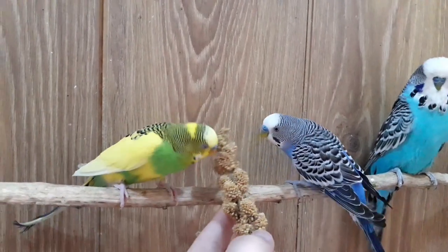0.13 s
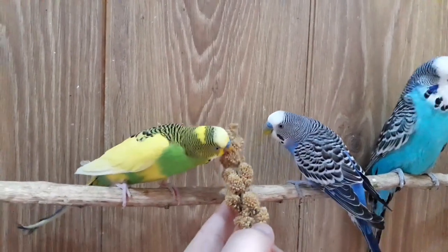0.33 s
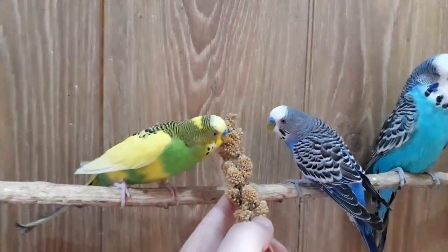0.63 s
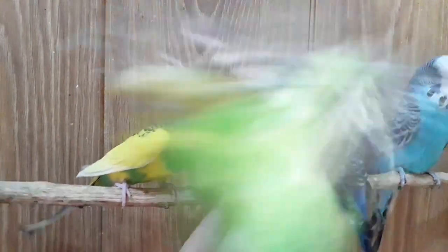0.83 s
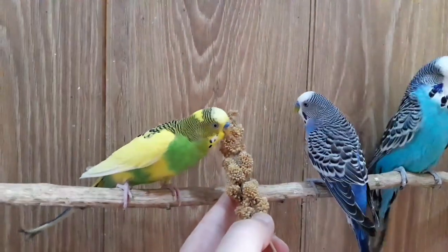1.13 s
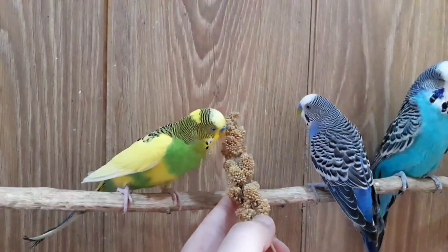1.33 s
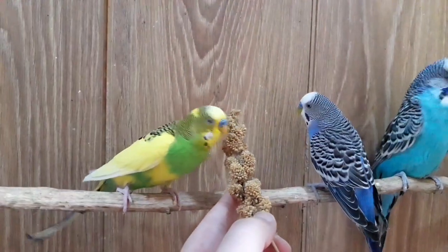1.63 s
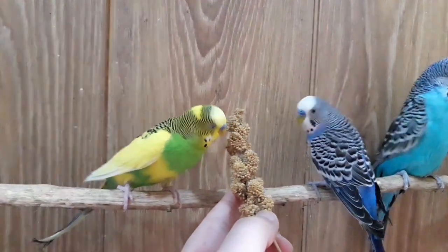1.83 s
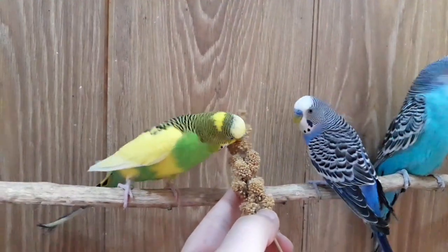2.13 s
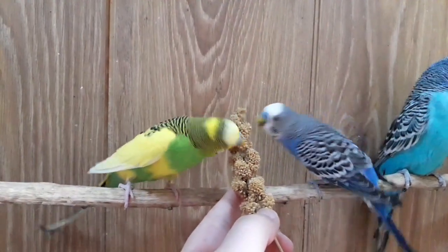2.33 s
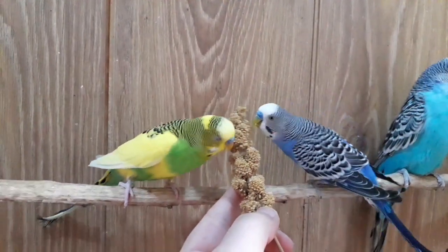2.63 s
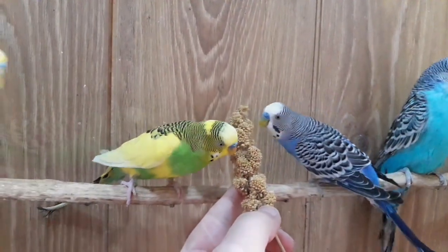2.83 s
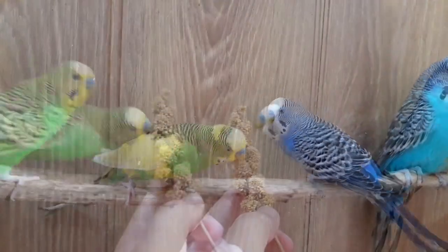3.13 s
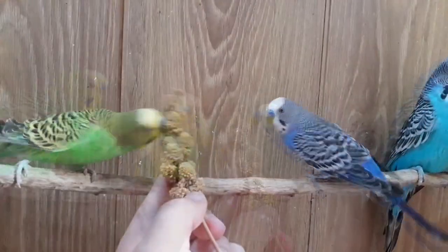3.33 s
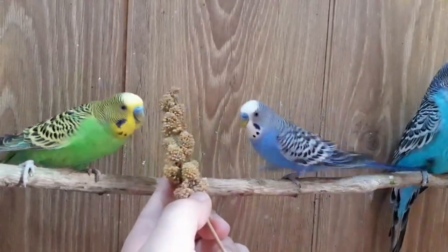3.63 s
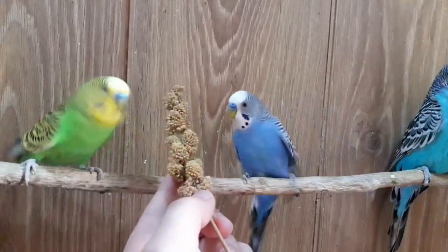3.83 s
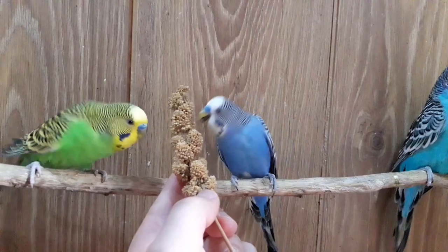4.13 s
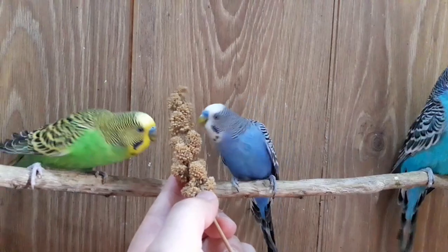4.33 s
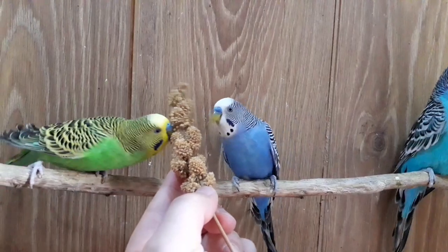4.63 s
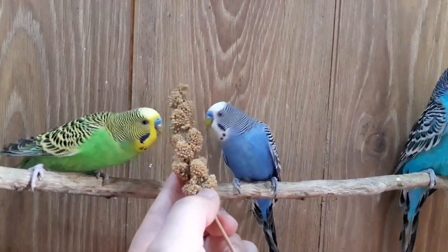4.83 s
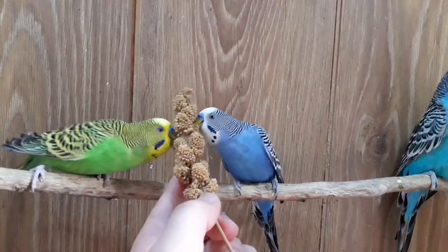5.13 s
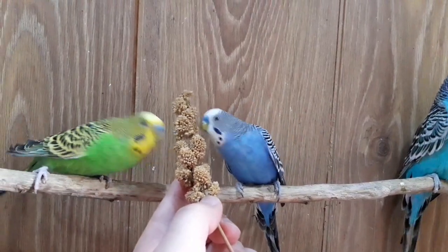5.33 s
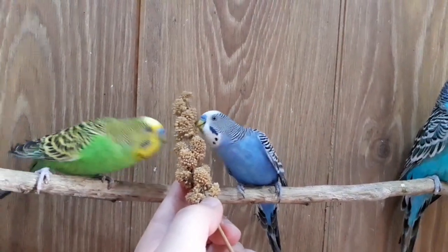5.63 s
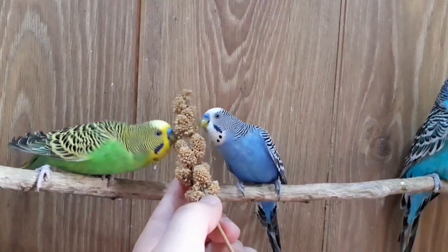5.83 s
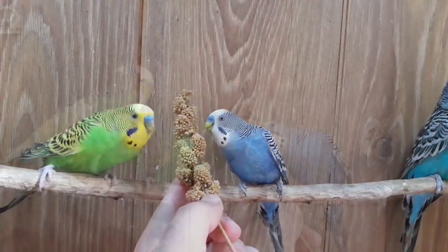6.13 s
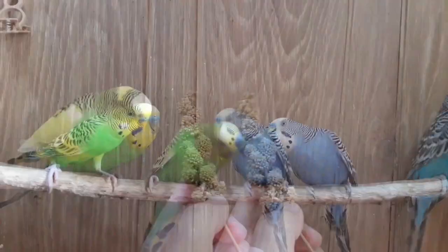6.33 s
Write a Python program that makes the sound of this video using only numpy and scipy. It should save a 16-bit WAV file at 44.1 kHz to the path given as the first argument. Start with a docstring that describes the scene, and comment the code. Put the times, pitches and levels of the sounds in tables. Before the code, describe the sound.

Close up in a quiet, dry room, budgies share a millet spray on a wooden perch. Feathers rustle, then a brief flutter brings rapid, low wing thumps on the microphone. Fine, crisp seed cracking follows and thickens, interrupted by another feather rustle and low, humming perch bumps. Nibbling continues with dull little taps and a short thin peep near the end.

```python
"""Feathers rustle in a hushed room while budgies on a wooden perch nibble at a spray of millet.
A neighbour peeps, steps set the perch humming, beaks crack hulls, and a fluttering bird blows on the microphone.
Feathers, nibbles and cracks are shaped noise, with a microphone ring in the cracks; peeps and hum are wavering tones.
Gusts are single pressure swings, hops rub wood resonances, and dropped bits tap as short low tones."""
import sys
import numpy as np
from scipy import signal
from scipy.fft import rfft, irfft, next_fast_len
from scipy.io import wavfile

SR = 44100
rng = np.random.default_rng(int(sys.argv[2]) if len(sys.argv) > 2 else 0)


def to_wav(sig):
    """Store sig (one row per channel, or 1-D mono) as 16-bit WAV at the path in sys.argv[1].

    Samples outside -1..1 are clipped; the rate is SR.
    """
    pcm = np.clip(np.atleast_2d(sig), -1, 1) * 32767
    pcm = np.round(pcm).astype(np.int16)
    wavfile.write(sys.argv[1], SR, pcm.T)  # frames by channels


N = 286209
TIME = np.arange(N) / SR   # seconds


def amp(db):
    """Turn decibels into a gain."""
    return 10 ** (np.asarray(db) / 20)


def unit(x):
    """Scale to an average (rms) level of 1."""
    return x / np.sqrt(np.mean(x ** 2) + 1e-20)


def curve(rows, column=1, outside=None):
    """Join one column of a table by straight lines in time."""
    rows = np.array(rows)
    return np.interp(TIME, rows[:, 0], rows[:, column], outside, outside)


def colour(x, points):
    """Shape the spectrum of a signal by points joined on a log-frequency axis."""
    size = next_fast_len(N)
    hz = np.maximum(np.arange(size // 2 + 1) * SR / size, 1)
    points = np.array(points)
    gain_db = np.interp(np.log(hz), np.log(points[:, 0]), points[:, 1])
    return unit(irfft(rfft(x, size) * amp(gain_db), size)[:N])


def band(x, low_hz, high_hz):
    """Keep mainly what lies between two frequencies."""
    edges_hz = [low_hz, min(high_hz, .45 * SR)]
    return signal.sosfilt(signal.butter(2, edges_hz, "band", fs=SR, output="sos"), x)


def resonance(x, hz, width_hz):
    """Ring at one frequency, with gain 1 on top; a narrow width rings longer."""
    r = np.exp(-np.pi * width_hz / SR)
    feedback = [1, -2 * r * np.cos(2 * np.pi * hz / SR), r * r]
    return signal.lfilter([(1 - r * r) / 2, 0, (r * r - 1) / 2], feedback, x)


def drift(rate_hz):
    """Wander slowly by chance, with a spread of 1."""
    r = np.exp(-2 * np.pi * rate_hz / SR)
    wander = signal.lfilter([1], [1, -2 * r, r * r], rng.standard_normal(N + SR))
    return unit(wander[SR:])   # skip the first second, while the filter settles


def add(out, s, burst):
    """Mix a burst in at a moment."""
    at = max(round(s * SR), 0)
    out[at:at + len(burst)] += burst[:N - at]


def swell(s, peak_db, rise_db_per_s, held_s, fall_db_per_s, choke_db_per_s2=0):
    """Gain that rises to a crest, holds and dies, straight in decibels or ever faster."""
    early = np.minimum(TIME - s, 0)
    late = np.maximum(TIME - s - held_s, 0)
    db = peak_db + early * rise_db_per_s - late * (fall_db_per_s + late * choke_db_per_s2)
    gain, heard = np.zeros(N), db > -125
    gain[heard] = amp(db[heard])
    return gain


# moves of the plumage, each swelling fast and dying away:
# crest_s, swish_db, fall_db_per_s, body_db (low part, relative to swish), sizzle_db (top part, likewise)
PLUMAGE_MOVES = [(0.0, -48, 91.5, -1.5, -5), (0.068, -64.5, 248, -2.5, -11), (.16, -68, 65, -47, -13),
                 (.37, -55.5, 106, -16.5, -4), (0.449, -62, 150.5, -27.5, -9), (.542, -43.5, 57.5, -13, 1),
                 (.572, -44, 87.5, -5.5, -1.5), (0.63, -47, 169.5, -1, -4),
                 (0.689, -45.5, 220.5, -6.5, -1.5), (0.745, -44.5, 259.5, -2, 0.5),
                 (0.804, -37.5, 259.5, -3, -4), (0.857, -40, 229.5, -2.5, -5),
                 (0.919, -41, 246.5, -2, -3.5), (0.984, -31, 270, -8, -0.5), (1.016, -30, 150, -8.5, -4),
                 (1.089, -47.5, 304, -4.5, -3.5), (1.13, -37.5, 177, 1.5, -3.5),
                 (1.173, -52.5, 207, 10.5, -14), (1.3, -79, 303, -11, -1), (1.378, -66, 188, 6, -15),
                 (1.45, -59.5, 270, -6, 4.5), (1.7, -54, 270, -8, -6), (1.788, -61, 108, 1, -6),
                 (1.858, -55, 303, -33, -27), (2.975, -56.5, 177, -1.5, -1), (3.058, -55, 95, -3.5, -1),
                 (3.097, -47.5, 178, -3, -2.5), (3.194, -44, 317, -7, -2.5), (3.274, -51, 150, -7, -8),
                 (3.3, -40.5, 147, -2.5, -5), (3.342, -63.5, 204, -10, 3), (3.466, -55, 141, -0.5, -2.5),
                 (3.575, -47, 298, -8, -7), (3.674, -56.5, 43, 1, -5), (3.849, -54.5, 146, -10, 1.5),
                 (3.91, -71.5, 103, 5.5, -1), (3.96, -67, 240, -28, 5), (4.421, -57.5, 68, -9.5, 0.5),
                 (4.472, -62, 153, -13.5, -22), (4.828, -52, 210, -16, -9), (5.378, -61, 207, -26, -11),
                 (6.39, -68.5, 195, -1.5, 6.5), (6.426, -57.5, 130, -14, -6)]
# sharper feather strokes on top of the swish: start_s, level_db, sizzle_db (relative to swish), length_s
FEATHER_STROKES = [(0.557, -45, -1.5, 0.036), (0.654, -52, -2, 0.013), (0.692, -74, 11, 0.027),
                   (0.703, -42, 3, 0.0046), (0.748, -43, 4, 0.018), (0.803, -41.5, -0.5, 0.03),
                   (0.857, -45, 3, 0.025), (0.872, -56, 0, 0.012), (0.916, -56.5, 1.5, 0.044),
                   (0.972, -48, -1, 0.023), (1.007, -38.5, -25, 0.019), (1.041, -34, -12, 0.021),
                   (1.127, -39, -10, 0.016), (1.16, -56, -8, 0.013), (3.562, -68, -16, 0.028)]
# tone colour of feathers before they are split into registers: pitch_hz, density_db (per Hz)
FEATHER_COLOUR = [(150, 20.5), (250, 2.5), (470, -9.5), (1110, -9.5), (1750, -2.5), (3010, -1),
                  (4350, -0.5), (5190, 0), (6630, 4), (7500, 1), (9420, -0.5), (15100, -10.5),
                  (16500, -32.5)]
RUSTLE_RISE_DB_PER_S = 2000.5


def plumage():
    """Vanes slide over each other: grainy noise in three registers, with sharper strokes on top."""
    grain_size = amp(3.0 * np.minimum(rng.exponential(1, N), 3))
    barbs = (rng.random(N) < 4000 / SR) * grain_size * rng.standard_normal(N)   # about 4000 grains a second
    lumpy = rng.standard_normal(N) * amp(1.27 * drift(110))
    air = colour(0.52 * unit(barbs) + lumpy, FEATHER_COLOUR)
    body = unit(band(band(air, 290, 2600), 330, 2700))
    swish = unit(band(air, 1600, 6870))
    sizzle = unit(band(air, 5000, 22000))
    swish = unit(swish + 0.82 * resonance(swish, 4200, 950))   # the microphone favours a band near 4.2 kHz
    body = body * amp(0.84 * drift(39))   # body and sizzle each flutter on their own
    sizzle = sizzle * amp(1.8 * drift(28))

    rustles = np.zeros(N)
    for s, swish_db, fall, body_db, sizzle_db in PLUMAGE_MOVES:
        mix = swish + amp(body_db) * body + amp(sizzle_db) * sizzle
        rustles += swell(s, swish_db, RUSTLE_RISE_DB_PER_S, 0, fall) * mix

    swish_gain, sizzle_gain = np.zeros((2, N))
    t = np.arange(4000) / SR
    for s, level_db, sizzle_db, length in FEATHER_STROKES:
        # the vanes part abruptly
        stroke = amp(level_db) * (1 - np.exp(-t / .0015)) * np.exp(-(t / length) ** 3)
        add(swish_gain, s, stroke)
        add(sizzle_gain, s, amp(sizzle_db) * stroke)
    return (rustles + swish_gain * swish + sizzle_gain * sizzle) * amp(2.0 * drift(41))


# tone colour of the room's hush: pitch_hz, density_db (per Hz)
HUSH_COLOUR = [(15, -68.5), (25, -13), (65, 7.5), (124, 6.5), (280, -5), (1090, -13), (2820, -15.5),
               (4020, -41.5), (5720, -33.5), (9850, -18), (14400, -16.5), (16500, -27)]
HUSH_DB = -72.5   # before its slow drift


def hush():
    """The quiet room is steady coloured noise whose level wanders slowly."""
    return amp(HUSH_DB) * colour(rng.standard_normal(N), HUSH_COLOUR) * amp(1.5 * drift(6))


# nibbling, joined by straight lines; it also guides the small cracks: time_s, rustle_db (before flicker)
NIBBLE_LEVEL = [(0, -78), (.13, -94), (.16, -71), (.5, -68), (1.2, -70), (1.35, -73), (1.5, -66),
                (2.05, -68), (2.2, -69.5), (2.25, -78), (2.34, -79), (2.37, -69.5), (2.68, -65.5),
                (2.74, -79.5), (2.78, -63.5), (2.9, -67.5), (3.0, -74.5), (3.6, -71.5), (3.85, -65),
                (4.02, -73.5), (4.07, -88), (4.21, -88), (4.24, -67.5), (4.7, -67), (4.78, -77), (5.0, -67),
                (5.25, -66), (5.33, -77.5), (5.4, -66), (5.47, -77), (5.53, -63), (5.64, -74.5),
                (5.75, -67.5), (6.3, -66.5), (6.35, -73.5), (6.49, -65)]
# tone colour of rubbing hull bits: pitch_hz, density_db (per Hz)
HULL_COLOUR = [(880, -48), (1500, -8.5), (2820, -8.5), (4050, 2), (5360, -2), (8510, 2), (14100, -1.5),
               (16000, -3), (16500, -10.5)]


def nibbling():
    """Tiny hull fragments rub and tick in clumps; the lower and upper treble wander apart."""
    tick_size = amp(1.2 * np.minimum(rng.exponential(1, N), 3))
    ticks = (rng.random(N) < 3000 / SR) * tick_size * rng.standard_normal(N)   # about 3000 ticks a second
    rustle = colour(unit(ticks) + 0.85 * rng.standard_normal(N), HULL_COLOUR)
    lower = band(rustle, 500, 7500)
    upper = rustle - lower
    patchy = lower * amp(2.4 * drift(17.0)) + upper * amp(2.0 * drift(11))
    return amp(curve(NIBBLE_LEVEL) + 2.0 * drift(47) + 2.0 * drift(12)) * patchy


# peeps of a neighbour, and at 3.196 s the short ring of a tick:
# crest_s, held_s, first_hz, last_hz, level_db (before its tremble)
PEEPS_AND_TICK_RING = [(.19, 0.307, 2490, 2485, -75), (1.7, 0.057, 3240, 3290, -72),
                       (1.78, 0.017, 1746, 1780, -65.5), (3.196, 0.0029, 2290, 2280, -50.5),
                       (5.03, 0.12, 2280, 2280, -74.5), (5.28, .04, 2200, 2210, -89.5),
                       (5.92, 0.019, 2230, 2330, -76.5), (6.1, 0.038, 2050, 2010, -71.5),
                       (6.122, 0.043, 3535, 3670, -56.5), (6.175, 0.031, 3670, 3600, -63)]
PEEP_RISE_DB_PER_S, PEEP_FALL_DB_PER_S = 1800, 447.5


def peeps_and_tick_ring(wobble_hz, flutter_db, breath):
    """Thin, hoarse tones with a weak octave: pitch and level tremble, air noise rides on them."""
    wobble = wobble_hz * drift(60)
    voice = amp(flutter_db * drift(53)) + breath * drift(300)
    out = np.zeros(N)
    for s, held, first_hz, last_hz, level_db in PEEPS_AND_TICK_RING:
        pitch = np.interp(TIME, [s, s + held + .03], [first_hz, last_hz])
        phase = 2 * np.pi * np.cumsum(pitch + wobble) / SR
        tone = np.sin(phase) + 0.11 * np.sin(2 * phase)
        out += swell(s, level_db, PEEP_RISE_DB_PER_S, held, PEEP_FALL_DB_PER_S) * tone
    return np.sqrt(2) * voice * out


# steps that set the perch humming: crest_s, level_db, held_s, fall_db_per_s (at first)
PERCH_STEPS = [(.312, -70, 0.0075, 112), (1.406, -60.5, 0.0056, 383), (2.982, -43.5, 0.051, 213),
               (3.45, -43, 0.049, 400), (3.549, -48.5, 0.018, 192), (3.676, -41.5, 0.0067, 402.5),
               (3.721, -48.5, .04, 457), (3.864, -38, 0.056, 65), (4.446, -50.5, 0.052, 170),
               (5.488, -66, .003, 402), (5.643, -58.5, 0.061, 906), (5.738, -58.5, 0.067, 260),
               (6.397, -58, 0.002, 184), (6.46, -66, .003, 260)]
# creaks of the perch under a hop: crest_s, level_db, held_s
PERCH_CREAKS = [(0.601, -48.5, 0.0563), (3.666, -52, 0.0568), (3.85, -58.5, 0.08), (4.008, -94, 0.9),
                (6.4, -68, .07)]
# higher ways the wood can ring in a creak: pitch_hz, width_hz, level_db (relative)
WOOD_MODES = [(544, 110, 13.5), (666, 130, 10.5), (870, 8.7, 5), (1180, 17, 3), (2380, 300, 8),
              (2530, 110, 7)]
# dull taps of dropped bits: start_s, level_db, pitch_hz, t60_s (time to fall by 60 dB)
DULL_TAPS = [(1.573, -43, 169, 0.05), (2.421, -44.5, 159, 0.072), (2.533, -49, 164, 0.032),
             (4.968, -40.5, 162, 0.043), (5.87, -47.5, 132, 0.039), (6.209, -48.5, 181, 0.049)]
PERCH_HZ, STEP_RISE_DB_PER_S = 180.2, 934   # the pitch wavers around this
GRIP_DAMPING_DB_PER_S2 = 898   # the feet close round the perch and choke the hum
CREAK_RISE_DB_PER_S, CREAK_FALL_DB_PER_S = 700, 150.5


def perch():
    """The lowest bending mode hums; a hop rubs the higher modes; taps ring short and low."""
    phase = 2 * np.pi * np.cumsum(PERCH_HZ + 2.5 * drift(8)) / SR
    hum = np.sqrt(2) * np.sin(phase) * amp(.6 * drift(25))
    steps = np.zeros(N)
    for s, level_db, held, fall in PERCH_STEPS:
        steps += swell(s, level_db, STEP_RISE_DB_PER_S, held, fall, GRIP_DAMPING_DB_PER_S2)
    out = hum * steps

    rub = rng.standard_normal(N) * amp(1.8 * drift(54))   # the grip slips in lumps
    grip, wood = np.zeros((2, N))
    for s, level_db, held in PERCH_CREAKS:
        grip += swell(s, level_db, CREAK_RISE_DB_PER_S, held, CREAK_FALL_DB_PER_S)
    for hz, width, level_db in WOOD_MODES:
        wood += amp(level_db) * unit(resonance(resonance(rub, hz, width), hz, 2 * width))
    out += grip * unit(wood)

    t = np.arange(SR // 4) / SR
    for s, level_db, hz, t60 in DULL_TAPS:
        envelope = (1 - np.exp(-t / 0.00033)) * amp(-60 * t / t60)
        add(out, s, amp(level_db) * np.sin(2 * np.pi * hz * t) * envelope)
    return out


FIRST_BREAK_DB, FIRST_BREAK_S = 6, 0.00084   # the first split stands out of the crumble


def splinters(t60, length):
    """A brittle break: lumpy noise, quick rise with a spike, exponential death."""
    t = np.arange(length) / SR
    white, lumps = rng.standard_normal((2, length))
    lumpy = amp(1.77 * unit(signal.lfilter([1], [1, -.95], lumps)))
    spike = amp(FIRST_BREAK_DB * np.exp(-t / FIRST_BREAK_S))
    return white * lumpy * spike * (1 - np.exp(-t / .0005)) * amp(-60 * t / t60)


# hull cracks, with a few feather snaps near 3.1 and 3.3 s:
# time_s, level_db (of the snap, before the last filters), brightest_hz,
# ring_db (microphone, relative to the snap), t60_s (time for the break to fall by 60 dB)
CRACKS_AND_FEATHER_SNAPS = [(0.37, -41.5, 7200, -26, 0.028), (0.4484, -48, 6750, -17, 0.028),
                            (1.294, -37, 8030, -11, 0.028), (1.3075, -44, 8140, -15, 0.025),
                            (1.3733, -54, 9740, -31, 0.028), (1.449, -40.5, 9300, -15, 0.026),
                            (1.517, -43, 12800, -11, 0.028), (1.537, -43.5, 8650, -1, 0.032),
                            (1.656, -50, 8000, -14, 0.028), (1.6837, -37.5, 6120, -20, 0.051),
                            (1.702, -40, 5350, -17, 0.057), (1.721, -36, 12800, -15, 0.028),
                            (1.7724, -38, 9900, -8, 0.037), (1.8357, -49, 8400, -13, 0.021),
                            (1.8667, -39, 8700, -9, 0.036), (1.9895, -46, 8730, -15, 0.051),
                            (2.1114, -40.5, 9250, -17, 0.028), (2.1291, -41.5, 13200, -15.5, 0.084),
                            (2.171, -47.5, 13100, -19, 0.032), (2.2029, -41.5, 9100, -19, 0.028),
                            (2.4195, -49, 8740, -11, 0.028), (2.4718, -49, 14050, -7, 0.028),
                            (2.4923, -37, 10500, -12, 0.018), (2.5446, -44.5, 14100, -15.5, 0.028),
                            (2.563, -41, 13600, -5, 0.028), (2.583, -54, 14300, -15, 0.031),
                            (2.598, -31.5, 11200, -13, 0.054), (2.616, -30.5, 11800, -4, 0.04),
                            (2.6377, -39, 6900, -13, 0.044), (2.659, -35.5, 8480, -3, 0.031),
                            (2.7005, -39.5, 6540, -3, 0.028), (2.766, -37.5, 7310, -8, 0.035),
                            (2.7793, -24.5, 13600, -11.5, 0.05), (2.808, -35.5, 7430, -3.5, 0.024),
                            (2.8244, -42, 13300, -7, 0.028), (2.8532, -41, 7400, 1.5, 0.028),
                            (2.9226, -27.5, 11200, -18, 0.055), (3.0944, -35, 10300, -16, 0.031),
                            (3.1941, -33.5, 7240, -1, 0.028), (3.3448, -44, 5450, 12, 0.028),
                            (3.4456, -41, 12700, -15, 0.045), (3.461, -36, 9700, -22, 0.034),
                            (3.675, -44, 9800, -15, 0.032), (3.7524, -43, 8760, -9, 0.031),
                            (3.8046, -44, 6400, -8, 0.03), (3.8417, -39, 13000, -19, 0.023),
                            (3.8836, -52, 6300, -12.5, 0.031), (3.9744, -46, 8700, -23, 0.028),
                            (4.0214, -42.5, 9050, -23, 0.028), (4.2807, -45, 9220, -17, 0.084),
                            (4.3008, -40, 12700, -19, 0.028), (4.4217, -29, 14440, -16, 0.035),
                            (4.4426, -34, 13500, -18, 0.037), (4.4854, -53, 5780, -15, 0.028),
                            (4.5524, -39.5, 13400, -22, 0.045), (4.585, -32.5, 13200, -5, 0.034),
                            (4.6299, -40, 10700, -19, 0.043), (4.6427, -33, 13500, -11.5, 0.039),
                            (4.6877, -40, 8350, -24, 0.055), (4.6992, -38.5, 5030, -23, 0.071),
                            (4.802, -37, 14200, -38, 0.028), (4.8229, -45, 5070, -15, 0.028),
                            (4.8746, -43, 7800, -20, 0.028), (4.9447, -48, 8100, -21, 0.028),
                            (5.002, -42.5, 9600, -1, 0.042), (5.0674, -51, 10100, -15, 0.028),
                            (5.1176, -42, 4970, -4, 0.028), (5.1337, -36.5, 13100, -6, 0.04),
                            (5.1454, -37, 13100, -5, 0.028), (5.1583, -37.5, 13100, -2, 0.033),
                            (5.1997, -34.5, 13100, -4, 0.028), (5.2919, -48, 11100, -15, 0.028),
                            (5.3452, -24, 13200, -5, 0.041), (5.3764, -50, 14500, -12, 0.028),
                            (5.415, -42.5, 13400, 0, 0.028), (5.5028, -41, 10600, -25, 0.038),
                            (5.515, -37, 13300, -17, 0.028), (5.5243, -39.5, 11100, -13, 0.056),
                            (5.5588, -34.5, 11100, -9.5, 0.037), (5.6865, -46, 13100, -18, 0.028),
                            (5.7299, -39, 11700, -24, 0.028), (5.7399, -37, 14300, -21, 0.038),
                            (5.7736, -43.5, 8500, -20, 0.028), (5.788, -45, 11200, -15, 0.03),
                            (5.81, -37.5, 13300, -23, 0.034), (5.827, -37.5, 12800, 1.5, 0.036),
                            (5.9064, -60, 8200, -26, 0.028), (5.915, -31.5, 12800, -22, 0.044),
                            (5.9684, -38, 8790, -12, 0.045), (5.9773, -28, 13300, -6.5, 0.05),
                            (6.0423, -45.5, 6200, 6.5, 0.057), (6.1114, -47, 6720, -22, 0.026),
                            (6.1973, -46, 6270, -8, 0.028), (6.2407, -41, 14400, -1, 0.023),
                            (6.2668, -40, 13000, 1.5, 0.074), (6.2754, -46.5, 12900, -8, 0.026),
                            (6.3014, -49, 5000, -7, 0.035), (6.3839, -43, 4970, -15, 0.028),
                            (6.4154, -43, 6240, -15, 0.035), (6.439, -44, 6160, -8, 0.028)]
MICROPHONE_RING_HZ, MICROPHONE_RING_WIDTH_HZ = 4300, 2100
SMALL_CRACKS_PER_S, SMALL_CRACK_T60_S = 8, .025
SMALL_CRACK_OVER_RUSTLE_DB = 14   # the faintest ones; chance adds up to 8 dB


def cracks():
    """Each break snaps in its own bright colour and excites the microphone's ring near 4 kHz."""
    out = np.zeros(N)
    # small cracks fall by chance
    when, size, pitch = rng.random((int(SMALL_CRACKS_PER_S * N / SR), 3)).T
    when = when * TIME[-1]
    rustle_db = curve(NIBBLE_LEVEL)[(when * SR).astype(int)]
    small_db = rustle_db + SMALL_CRACK_OVER_RUSTLE_DB + 8 * size
    small_hz = 6000 * 2.3 ** pitch
    small = [(s, db, hz, -18, SMALL_CRACK_T60_S) for s, db, hz in zip(when, small_db, small_hz)]
    for s, level_db, hz, ring_db, t60 in list(CRACKS_AND_FEATHER_SNAPS) + small:
        burst = splinters(t60, length=3000)
        snap = 0.74 * resonance(burst, hz, 0.14 * hz) + 0.27 * band(burst, 5200, 12300)
        ring = resonance(burst, MICROPHONE_RING_HZ, MICROPHONE_RING_WIDTH_HZ)
        ring = resonance(ring, MICROPHONE_RING_HZ, 1.6 * MICROPHONE_RING_WIDTH_HZ)
        crack = snap / abs(snap).max() + amp(ring_db) * ring / abs(ring).max()
        add(out, s - .001, amp(level_db) * crack)
    bright = band(band(out, 4200, 19500), 2930, 19500)
    return 0.72 * bright + 0.034 * out   # little sounds below the ring


# wing draught on the microphone, joined by straight lines: time_s, level_db (before its drift)
WING_DRAUGHT = [(0.52, -86), (0.62, -47), (0.734, -42), (0.775, -38), (0.884, -38), (0.91, -45.5),
                (1.054, -53), (1.128, -75), (1.35, -63), (1.45, -74)]
# single gusts of a downstroke: crest_s, level_db (before the envelope), pitch_hz
WING_GUSTS = [(0.638, -41.5, 89), (0.715, -32, 81), (0.7673, -14, 118), (0.82, -18, 101), (0.876, -27, 117),
              (0.886, -34.5, 130), (0.936, -32, 82.5), (0.983, -32.5, 89), (1.041, -40, 137)]


def draught():
    """Wing beats blow on the microphone: lumpy low turbulence, and a pressure swing for each listed gust."""
    turbulence = unit(band(rng.standard_normal(N), 44, 290)) * amp(1.3 * drift(7.6))
    out = amp(curve(WING_DRAUGHT, outside=-200)) * turbulence
    for s, level_db, hz in WING_GUSTS:
        turns = (TIME - s) * hz
        width = np.where(turns < .28, .55, .7)   # in turns; it fades a little slower than it grows
        out += amp(level_db) * np.cos(2 * np.pi * turns) * np.exp(-((turns - .28) / width) ** 2)
    return out


ROOM_T60_S, ROOM_DB = 0.093, -16.5   # time for the lower part to fall by 60 dB; gain of the answer


def room(x):
    """Dying noise answers; the treble dies sooner, with a faint wide part of opposite sign in the two ports."""
    t = np.arange(SR // 2) / SR
    low, high, wide = rng.standard_normal((3, len(t))) * (t > .003)   # silent for the first 3 ms
    low = band(low, 100, 5500) * amp(-60 * t / ROOM_T60_S)
    treble_fade = amp(-60 * t / (0.78 * ROOM_T60_S))
    high, wide = band(np.array([high, wide]), 11000, 19000) * treble_fade
    scale = np.sqrt(np.sum(low ** 2))
    mid = signal.fftconvolve(x, (low + 1.4 * high) / scale)[:N]
    side = signal.fftconvolve(x, 0.12 * wide / scale)[:N]
    return mid + side * [[1], [-1]]


def scene():
    """All sources sit in the middle over the hush; the room answers the birds."""
    tones = peeps_and_tick_ring(wobble_hz=25.1, flutter_db=3.5, breath=0.56)
    birds = plumage() + nibbling() + tones + cracks()
    return birds + perch() + draught() + hush() + amp(ROOM_DB) * room(birds)


# tone colour of the faint hiss between the ports: pitch_hz, density_db (per Hz)
HISS_COLOUR = [(15, -41), (25, -7.5), (134, -7.5), (3160, -17), (7110, -7.5), (14000, -9), (16000, -13)]
HISS_DB = -83   # before it wavers
CUTOFF_HZ = 16500


def record(dry):
    """Add a faint wavering hiss, opposite in the two ports; the top is cut steeply."""
    waver = amp(HISS_DB + 3.8 * drift(18))
    hiss = waver * colour(rng.standard_normal(N), HISS_COLOUR) * [[1], [-1]]
    return signal.sosfilt(signal.cheby2(18, 70, CUTOFF_HZ, fs=SR, output="sos"), dry + hiss)


dry = scene()
out = record(dry)
to_wav(out)
```